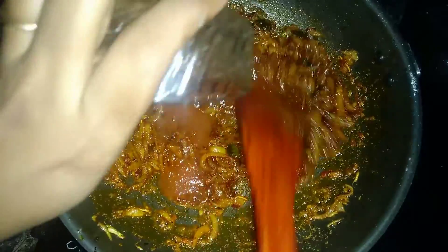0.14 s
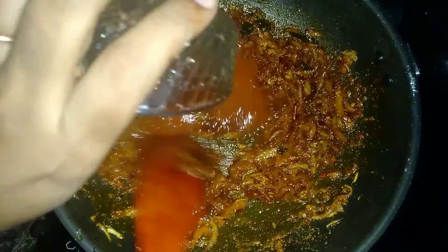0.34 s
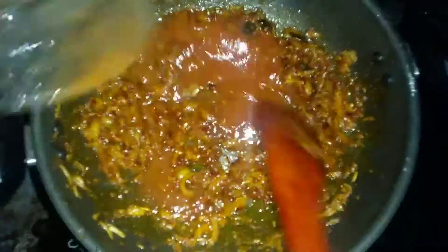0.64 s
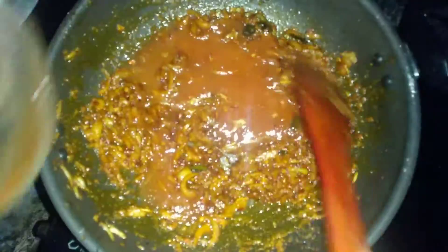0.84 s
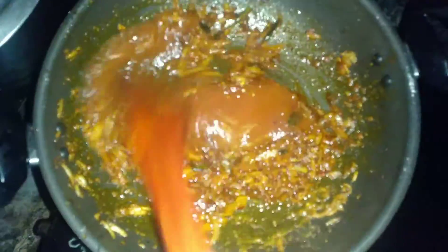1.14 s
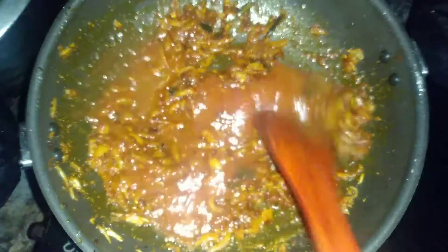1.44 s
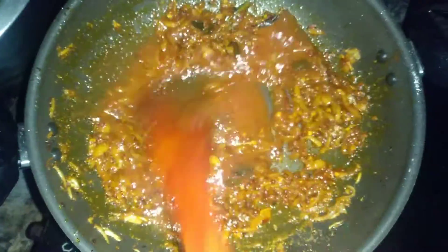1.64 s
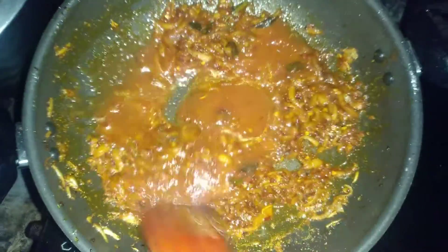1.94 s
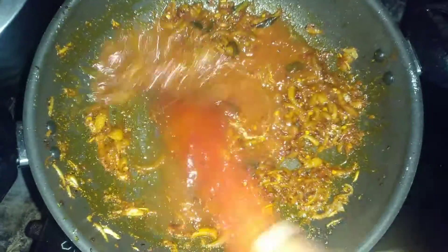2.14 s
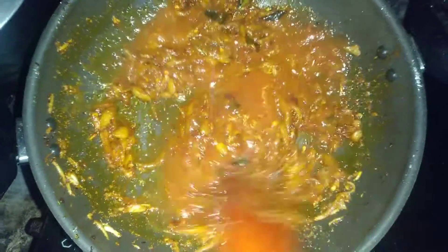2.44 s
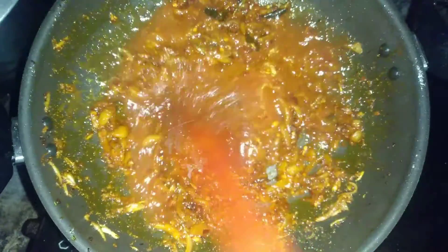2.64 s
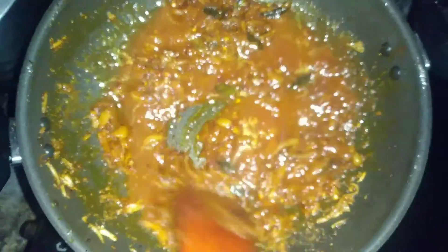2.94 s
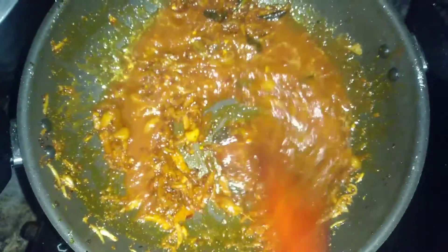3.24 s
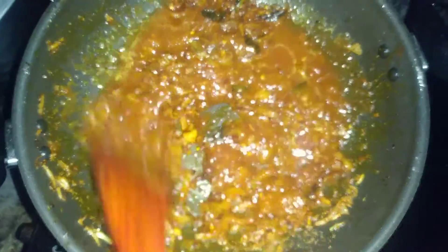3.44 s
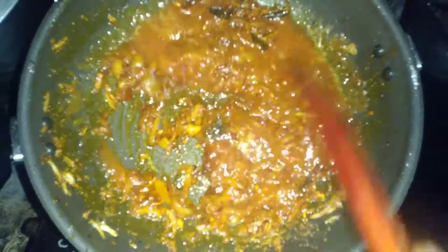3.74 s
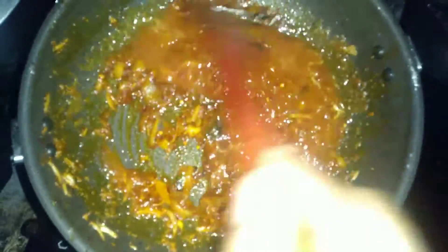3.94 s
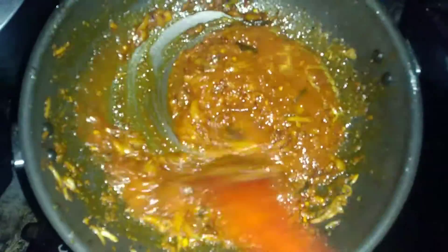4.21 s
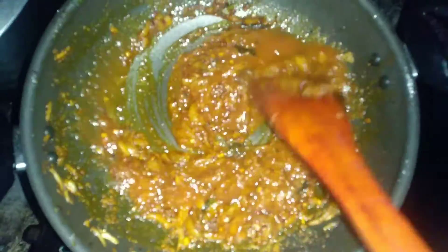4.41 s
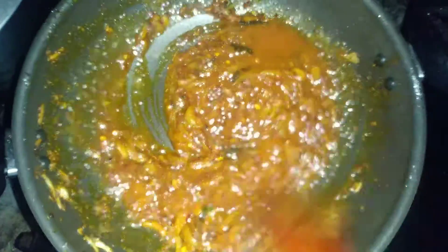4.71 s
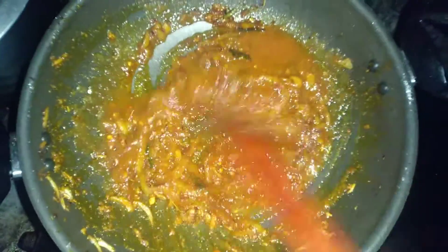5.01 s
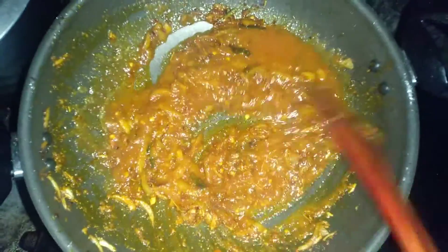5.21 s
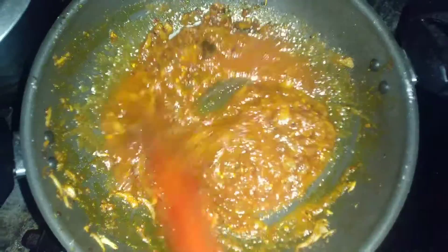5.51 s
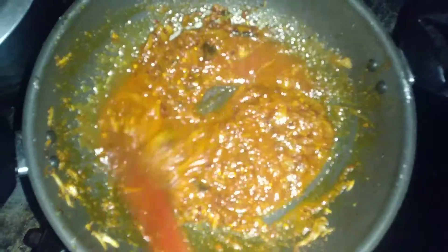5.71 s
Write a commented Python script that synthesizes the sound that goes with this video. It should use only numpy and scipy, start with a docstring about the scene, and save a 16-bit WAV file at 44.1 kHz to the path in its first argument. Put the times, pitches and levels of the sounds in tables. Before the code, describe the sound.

Close stereo sound of onion masala frying in a pan in a small kitchen. Sauce goes in with a strong hissing surge and bubbling, then the sizzle dips and swells with stirring. A spatula knocks early, scrapes and taps through the middle, and lands its hardest clack near five seconds, over faint burner rumble.

```python
"""A wide, bubbling sizzle swells and sinks; a spatula knocks and scrapes over a low rumble and a faint rising whine.
Onion masala fries in hot oil in a small kitchen while sauce is poured in and stirred.
Sizzle: random bubble bursts, shaped in spectrum, surge where wet sauce meets bare hot metal; steam jets are noise bands.
Knocks: a contact tone plus damped pan modes. Scrapes: trains of short stick-slip notes. Sauce: short bubble notes.
Burner: low shaped noise. Whine: a gliding sine. Only the spatula excites the modelled room."""
import sys
import numpy as np
from scipy import signal
from scipy.fft import rfft, irfft, next_fast_len
from scipy.io import wavfile
from scipy.ndimage import uniform_filter1d, map_coordinates

SR = 44100
rng = np.random.default_rng(int(sys.argv[2]) if len(sys.argv) > 2 else 0)


def wrap_up_sound(samples):
    """Save the sound to the file named by the first command line argument, as 16-bit audio."""
    columns = np.atleast_2d(samples).T
    # keep every value between -1 and 1, then stretch to whole-number steps
    tamed = np.clip(columns, -1, 1)
    steps = np.round(tamed * 32767).astype(np.int16)
    wavfile.write(sys.argv[1], SR, steps)


N = 258406

# Burner noise spectrum. Each row: frequency in Hz, relative density in dB per Hz.
RUMBLE_SPECTRUM = [(25, -36), (48, -17), (62, 1), (76, 6.5), (95, 4), (125, 4), (180, -10), (250, -14.5),
                   (340, 2.5), (450, -16.5), (800, -6), (1500, -21), (3000, -20.5)]
BURNER_DB = -64
# Stove shudder: level after the hardest blow, its dB per dB of blow, time to its peak.
SHUDDER_DB, SHUDDER_DB_PER_DB, SHUDDER_PEAK_S = -51, 2.1, 0.048

# Whine glide. Each row: time in seconds, pitch in Hz.
WHINE_PITCH = [(0, 335), (3.03, 339.5), (3.2, 361), (3.72, 391), (4.0, 440), (4.15, 455)]
# Whine swells. Each row: peak time in seconds, half length in seconds, level in dB.
WHINE_SWELLS = [(0.042, 0.078, -62), (3.197, 0.15, -61), (3.62, 0.11, -67), (3.971, 0.052, -50.5),
                (4.072, 0.059, -57)]

# Room decay. Each row: frequency in Hz, t60 in seconds.
ROOM_DECAY = [(150, 0.23), (1000, 0.2), (3000, 0.16), (12000, 0.061)]
ROOM_DB = -11
WALL_S, WALL_DB = 0.019, -8.5  # nearest wall's echo: delay, level beside the tail

# Level of the big sauce bubbles. Each row: time in seconds, level in dB.
SAUCE_LEVEL = [(0, -60.5), (.6, -56.5), (1.6, -54.5), (2.0, -59.5), (3.3, -61.5), (4.1, -64), (5.86, -66)]
BLUB_HZ, BLUB_OCTAVES, BLUB_CYCLES, BLUBS_PER_S = 901, 0.377, 12.6, 900  # pitch, scatter, life, rate

# Spatula strokes. Each row: start in seconds, length in seconds, level in dB, first pitch in Hz, last pitch in Hz,
# pitch scatter in octaves, share of the stroke at its hardest pressure, closing rasp re stroke in dB,
# rasp pitch in Hz, rasp scatter in octaves.
SCRAPES = [(0.403, 0.086, -45.5, 835, 953, 0.12, 0.35, -7, 1780, 0.23),
           (1.334, 0.12, -49.5, 2250, 2160, 0.023, 0.38, -17, 906, 0.11),
           (2.521, 0.057, -58, 270, 384, 0.51, 0.13, -8, 700, 0.47),
           (2.568, 0.064, -43.5, 824, 1093, 0.13, 0.47, 6, 1840, 0.095),
           (2.584, 0.05, -46.5, 2870, 2660, 0.051, 0.64, -8, 3530, 0.11),
           (3.425, 0.13, -44, 900, 1050, 0.21, 0.57, 6.5, 2390, 0.55),
           (3.433, 0.1, -45, 857, 954, .13, 0.52, -12, 1270, 0.14),
           (4.535, 0.12, -48, 2140, 2240, 0.039, 0.83, -8, 970, 0.28),
           (4.671, 0.033, -41.5, 2020, 1950, 0.089, 0.43, -12, 717, 0.18),
           (4.918, 0.061, -53, 870, 880, 0.33, 0.33, -18, 1800, 0.53),
           (5.6, 0.066, -54, 352, 240, 0.22, 0.18, -11, 800, 0.37),
           (5.672, 0.07, -49.5, 784, 634, 0.31, 0.26, -5, 405, 0.3),
           (5.728, 0.079, -44, 760, 1086, 0.26, 0.19, -6, 1870, 0.17),
           (5.734, 0.042, -53, 317, 390, 0.23, 0.27, -5, 584, 0.14)]
RASP_FROM_SHARE, RASP_CLIMB_RATIO = 0.37, 1.123  # rasp onset; it climbs from pitch / ratio to pitch * ratio
SLIPS_PER_S = 2500
JUDDERS_PER_S, JUDDER_DB = 170, 2.5

# Spatula blows. Each row: start in seconds, level in dB, contact pitch in Hz, lowest excited pitch in Hz
# (capped at 1100), highest excited pitch in Hz, thud in dB re blow, ring in dB re blow (before a common offset),
# left minus right of the clack in dB.
KNOCKS = [(0.747, -17, 947, 110, 1880, -1, -4, -8), (0.7478, -21.5, 1305, 1110, 1700, -9, -1, 4),
          (0.756, -26.5, 534, 200, 1200, -10, -13, -3), (2.586, -24.5, 924, 506, 1200, -11, -26, -6),
          (2.601, -27, 1020, 500, 1300, -16, -5, -1), (3.794, -19.5, 928, 100, 1310, 1, -1, -8),
          (4.5172, -27.5, 980, 131, 1320, 6, 3, -3), (4.676, -27, 1320, 1100, 2300, 0, 1, 1),
          (4.688, -29.5, 1550, 1090, 2400, -9, 5.5, 5), (5.1842, -14.5, 1294, 130, 2400, -3.5, -1.5, 3),
          (5.1846, -18, 890, 497, 1300, -10, -15, -4.5), (5.1852, -18.5, 1650, 1100, 2400, 0, -4, 3),
          (5.6688, -25, 900, 200, 1500, -3.5, -10.5, -6), (5.703, -35, 970, 500, 1300, -5, -14, -6),
          (5.714, -35, 410, 200, 1200, -4, -13, -1)]
# Ringing modes of the loaded pan. Each row: frequency in Hz, mean level in dB, t60 in seconds.
PAN_MODES = [(162.5, -8.5, 0.24), (246.5, -3, 0.23), (292.6, -16, 0.2), (435, -6, 0.23), (503.6, -4, 0.18),
             (618, -5, 0.14), (669, -7, 0.25), (819, -13, 0.15), (910, -1, 0.16), (983, -3.5, 0.24),
             (1195, 9.5, 0.165), (1380, -0.5, 0.12), (1512, 0.5, 0.15), (1820, -3, 0.13), (2440, -8, 0.14)]
# The pan's crowd of heavily damped modes. Each row: frequency in Hz, relative density in dB per Hz.
THUD_SPECTRUM = [(50, -42), (110, -17), (200, -9), (330, -7), (480, 5.5), (640, -1), (750, -14),
                 (920, -0.5), (1100, -6), (1280, 4), (1480, -4), (2350, -2), (2700, -14)]
# How much later the struck pan reaches the left port. Each row: frequency in Hz, lag in seconds.
PAN_LAG = [(200, 0.00027), (950, 0.00018), (1200, 0.00058), (2000, 0.0004)]
# How the struck pan radiates. Each row: frequency in Hz, left minus right in dB.
PAN_LEAN = [(200, -1.5), (350, 0), (520, -1), (750, -13), (1000, 7), (1300, 4.5), (2000, 0)]
CLACK_RISE_S, CLACK_S = 0.00088, 0.0047
SPATULA_TOP_HZ = 2500

# Steam pockets escaping the paste. Each row: start in seconds, length in seconds, level in dB, centre in Hz,
# half width in Hz.
JETS = [(0.291, 0.11, -36.5, 4360, 1150), (1.132, 0.04, -31, 8050, 500), (2.4, 0.053, -34, 7300, 450),
        (3.122, 0.031, -33.5, 8000, 700), (3.228, 0.049, -30.5, 8040, 800),
        (4.345, 0.047, -37.5, 8060, 800), (4.759, 0.33, -48, 4800, 1380)]

# Small bubbles in the paste. Each row: frequency in Hz, relative density in dB per Hz.
FRYING_SPECTRUM = [(250, -24), (500, -37), (880, -10), (1300, -9.5), (2200, -0.5), (2700, -5), (3500, 0),
                   (5000, 1), (6200, 3.5), (7500, 7.5), (10000, -21.5)]
# Main hiss. Each row: frequency in Hz, relative density in dB per Hz.
HISS_SPECTRUM = [(4000, -36), (6000, -20), (7000, -5), (7700, 1.5), (8700, 1.5), (9600, -10.5),
                 (11000, -19), (13000, -56)]
# Finest spray. Each row: frequency in Hz, relative density in dB per Hz.
SPRAY_SPECTRUM = [(7000, -29), (9500, 7.5), (11500, 3.5), (12600, 0.5), (13600, 0), (15800, -4.5)]
# Stereo balance of the frying. Each row: frequency in Hz, left minus right in dB.
FRYING_LEAN = [(400, 6), (800, 7), (1400, -0.5), (2300, 3), (3200, -2), (4200, -5), (4900, -10),
               (6000, -10.5)]
# Frying between surges; boiling() offsets the balance. Each row: time in seconds, hiss in dB,
# spray re hiss in dB, left minus right in dB.
SIMMER = [(0, -38.5, -10, -12), (.18, -39.5, -12, -10), (1.32, -57.5, -1.5, -3), (2.3, -39.5, -8.5, -11),
          (3.1, -43, -3.5, -7.5), (3.6, -47.5, -5, -19), (4.0, -50.5, -1.5, -15), (4.5, -46, -5.5, -11),
          (5.4, -43, -1, -9), (5.86, -44.5, -7, -9)]
# Wet sauce meets bare hot metal; boiling() offsets the balance. Each row: start in seconds, hold in seconds,
# fade time constant in seconds, hiss in dB, spray re hiss in dB, left minus right in dB.
SURGES = [(0.224, 0.21, 0.081, -31.5, -7.5, -12.5), (0.483, 0.46, 0.3, -35, -4, -29),
          (1.035, 0.14, 0.06, -37.5, -29, -8), (1.331, 0.28, 0.26, -33.5, -8.5, -16),
          (1.42, 0.16, 0.044, -38, -5, -18), (1.88, 0.016, 0.12, -38, -5, -4),
          (1.987, 0.14, 0.034, -40.5, -9, -8), (2.395, 0.15, 0.096, -35, -1, -3.5),
          (2.718, 0.029, 0.015, -42.5, -1, -12), (3.229, 0.074, 0.31, -40, -2, -8),
          (3.466, 0.024, 0.0076, -36.5, -24, -12), (4.146, 0.12, 0.029, -49, -3, -4),
          (4.546, 0.027, 0.03, -43.5, -8, -7), (4.722, 0.18, 0.19, -36.5, -2.5, -4.5),
          (5.545, .005, 0.014, -50, 8, -6)]
SURGE_RISE_S = 0.07
USUAL_HISS_DB = -40
FRYING_DB, FRYING_DB_PER_HISS_DB = -41, 0.77  # level at the usual hiss; how it follows the hiss
PIP_HZ, PIP_OCTAVES, PIP_CYCLES, PIPS_PER_S = 8060, 0.13, 9.2, 400  # ringing oil bubbles: pitch, scatter, life, rate
PIP_DB, SPIT_DB = -5, 7  # pips beside the hiss bursts, spits re hiss
SPUTTER_DB = 0.7
RIPPLE_PER_S = 14  # how fast the bubbling wanders over the pan

TOP_HZ = 15850


def amp(db):
    """Decibels to gain."""
    return 10 ** (np.asarray(db) / 20)


def unit(x):
    """x at rms 1."""
    return x / np.sqrt(np.mean(x ** 2) + 1e-20)


def along(points, hz):
    """Interpolate (Hz, value) points on a log frequency axis."""
    f, v = np.transpose(points)
    return np.interp(np.log(hz + 1), np.log(f + 1), v)


def curves(rows):
    """One value per sample for each column after the time."""
    s, *cols = np.transpose(rows)
    return [np.interp(np.arange(N) / SR, s, c) for c in cols]


def wobble(knots_per_s):
    """A smooth random curve."""
    knots = rng.standard_normal(int(N * knots_per_s / SR) + 4)
    return map_coordinates(knots, [np.arange(N) * knots_per_s / SR])


def filtered(x, response):
    """x times a response of frequency."""
    size = x.shape[-1]
    m = next_fast_len(size + 8192)
    return irfft(rfft(x, m) * response(np.fft.rfftfreq(m, 1 / SR)), m)[..., :size]


def panned(lean_db):
    """Left and right gains of mean power 1."""
    gains = amp(np.array([[.5], [-.5]]) * lean_db)
    return gains / np.sqrt(np.mean(gains ** 2, axis=0))


def left_lag(hz, lag_s):
    """Phase response that brings a sound to the left port lag_s after the right."""
    return np.exp(np.array([[-1j], [1j]]) * np.pi * hz * lag_s)


def at_ports(x, lean_db, lag_s):
    """A sound from one spot of the pan differs in level and arrival at the two ports."""
    return filtered(x, lambda hz: left_lag(hz, lag_s)) * panned(lean_db)


def add(track, s, sound):
    """Mix a sound into a track at time s."""
    start = max(round(s * SR), 0)
    part = track[..., start:start + sound.shape[-1]]
    part += sound[..., :part.shape[-1]]


def kitchen(x, delay_s):
    """A diffuse tail, treble dying first, fades in after delay_s; one wall adds a discrete echo."""
    hz, t, z = signal.stft(rng.standard_normal((2, SR // 2)), SR, nperseg=256)
    decay = amp(-60 * t / along(ROOM_DECAY, hz)[:, None])
    tail = signal.istft(z * decay, SR, nperseg=256)[1]
    shared = filtered(tail[0], lambda hz: 1 / (1 + (hz / 700) ** 4))  # long waves reach both ports alike
    tail = shared + filtered(tail, lambda hz: 1 - 1 / (1 + (hz / 700) ** 4))
    tail = tail * np.clip(np.arange(tail.shape[1]) / SR / delay_s - 1, 0, 1)
    diffuse = signal.fftconvolve(x, tail / np.linalg.norm(tail[0]), axes=1)[:, :N]
    echo = np.pad(x, ((0, 0), (int(WALL_S * SR), 0)))[:, :N]
    return diffuse + amp(WALL_DB) * echo


def stove():
    """Burner turbulence is low-pitched noise; blows on the pan set the stove shuddering, the hardest ones most."""
    t, level = np.arange(N) / SR, amp(BURNER_DB)
    hardest_db = max(db for _, db, *_ in KNOCKS)
    for s, db, *_ in KNOCKS:
        age = np.maximum(t - s, 0) / SHUDDER_PEAK_S
        shudder = amp(SHUDDER_DB + SHUDDER_DB_PER_DB * (db - hardest_db)) * age * np.exp(1 - age)
        level = np.hypot(level, shudder)
    air = rng.standard_normal(N) + 0.39 * rng.standard_normal((2, N))  # mostly common to both ports
    rumble = unit(filtered(air, lambda hz: amp(along(RUMBLE_SPECTRUM, hz))))
    return rumble * level * amp(1.9 * wobble(5.14))


def whine():
    """A thin sine climbs in pitch with a slight waver, coming and going in swells."""
    t = np.arange(N) / SR
    pitch_hz, = curves(WHINE_PITCH)
    pitch_hz = pitch_hz * (1 + 0.0018 * wobble(29.8))
    level = sum(amp(db) * np.exp(-2 * ((t - s) / half_s) ** 2) for s, half_s, db in WHINE_SWELLS)
    return level * np.sqrt(2) * np.sin(2 * np.pi * np.cumsum(pitch_hz) / SR)


def bubble_notes(rate_per_s, pitch_hz, octaves, life_cycles, spread_db):
    """Single bubbles at random moments, each with a short note that rises slightly; rms 1."""
    count, t = int(rate_per_s * N / SR), np.arange(SR // 50) / SR
    start = rng.integers(N, size=(count, 1))
    scatter = rng.standard_normal((count, 1))
    size = rng.standard_normal((count, 1))
    cycles = t * pitch_hz * 2 ** (octaves * scatter)
    age = cycles / life_cycles
    envelope = np.exp(-age) * (1 - np.exp(-6.7 * age))
    notes = amp(spread_db * size) * np.sin(2 * np.pi * cycles * (1 + age / 45)) * envelope
    return unit(np.bincount((start + np.arange(len(t))).ravel(), notes.ravel(), N)[:N])


def sauce():
    """Big bubbles burst in the wet sauce, each with a short low note."""
    db, = curves(SAUCE_LEVEL)
    blubs = bubble_notes(BLUBS_PER_S, BLUB_HZ, BLUB_OCTAVES, BLUB_CYCLES, spread_db=5)
    return at_ports(blubs * amp(db), lean_db=-4.5, lag_s=0.0002)


def stick_slip(length_s, first_hz, last_hz, scatter_octaves, crest):
    """The blade sticks and slips; each slip rings briefly at a pitch that slides along the stroke; rms 1."""
    n, t = int(length_s * SR), np.arange(SR // 50) / SR
    where = rng.random((int(length_s * SLIPS_PER_S) + 1, 1))  # share of the stroke
    glide = first_hz * (last_hz / first_hz) ** where
    pitch = glide * 2 ** (scatter_octaves * rng.standard_normal(where.shape))
    cycles = t * pitch
    life_cycles = 4.4 + 0.35 / (scatter_octaves + .01)  # evenly pitched slips ring on as a squeak
    envelope = np.exp(-cycles / life_cycles) * (1 - np.exp(-cycles / 0.47))
    sign = np.sign(rng.standard_normal(where.shape))
    slips = sign * np.sqrt(pitch) * np.sin(2 * np.pi * cycles) * envelope
    pressure = np.interp(where, [0, crest, 1], [.1, 1, .35])
    grip = rng.standard_normal(size=40)  # the blade judders, gripping unevenly
    judder = np.interp(where * length_s * JUDDERS_PER_S, np.arange(len(grip)), grip)
    slips = slips * pressure * amp(JUDDER_DB * judder)
    return unit(np.bincount(((where * n).astype(int) + np.arange(len(t))).ravel(), slips.ravel()))


def scrapes():
    """Each stroke rubs through the paste; towards its end the edge bites the metal with a climbing rasp."""
    out = np.zeros(N)
    for s, length_s, db, first_hz, last_hz, scatter, crest, rasp_db, rasp_hz, rasp_scatter in SCRAPES:
        add(out, s, amp(db) * stick_slip(length_s, first_hz, last_hz, scatter, crest))
        low_hz, high_hz = rasp_hz / RASP_CLIMB_RATIO, rasp_hz * RASP_CLIMB_RATIO
        rasp = stick_slip((1 - RASP_FROM_SHARE) * length_s, low_hz, high_hz, rasp_scatter, crest)
        add(out, s + RASP_FROM_SHARE * length_s, amp(db + rasp_db) * rasp)
    return at_ports(out, lean_db=0.0, lag_s=0.00011)


def pan_ring(t):
    """The pan's modes ring down, each at a slightly random level."""
    ring = np.zeros(len(t))
    for hz, db, t60_s in PAN_MODES:
        decay = amp(db + rng.normal(0, 1) - 60 * t / t60_s)
        ring += decay * np.sin(2 * np.pi * (hz * t + rng.random()))
    return ring


def pan_thud(t):
    """Crowded, damped modes as shaped noise: a quick shock, then a short shudder."""
    noise = unit(filtered(rng.standard_normal(len(t)), lambda hz: amp(along(THUD_SPECTRUM, hz))))
    return noise * (amp(-2.0 - 60 * t / 0.025) + amp(-18.0 - 60 * t / 0.23))


def knocks():
    """Each blow gives an abrupt, hollow clack; the pan shudders and rings briefly, damped by the food."""
    out, t = np.zeros((2, N)), np.arange(SR // 2) / SR
    radiation = lambda hz: panned(along(PAN_LEAN, hz)) * left_lag(hz, along(PAN_LAG, hz))
    for s, db, pitch_hz, low_hz, high_hz, thud_db, ring_db, lean_db in KNOCKS:
        age = np.maximum(t - np.array([[along(PAN_LAG, pitch_hz)], [0]]), 0)
        contact = (1 - np.exp(-age / CLACK_RISE_S)) * np.exp(-(age / CLACK_S) ** 6)
        clack = contact * np.sin(2 * np.pi * pitch_hz * age) * panned(lean_db)
        body = amp(thud_db) * pan_thud(t) + amp(ring_db - 17.5) * pan_ring(t)
        body = filtered(body, radiation) * (1 - np.exp(-t / 0.00093))
        # a soft contact spares the high modes, a glancing one the low
        reach = signal.butter(4, [min(low_hz, 1100), high_hz], "band", fs=SR, output="sos")
        add(out, s, amp(db) * (clack + signal.sosfilt(reach, body)))
    return signal.sosfilt(signal.butter(6, SPATULA_TOP_HZ, fs=SR, output="sos"), out)


def jets():
    """Steam escapes through a narrow gap with a brief, hissing squeal."""
    out = np.zeros((2, N))
    for s, length_s, db, centre_hz, half_width_hz in JETS:
        n = int(length_s * SR)
        band = lambda hz: 1 / (1 + ((hz - centre_hz) / half_width_hz) ** 4)
        squeal = unit(filtered(rng.standard_normal((2, n)), band))
        add(out, s, amp(db) * squeal * np.sqrt(np.hanning(n)))
    return out * panned(lean_db=-21)


def patchy(x, depth_db, order, size):
    """Random gain patches of size (bins, frames) on frames of order samples."""
    z = signal.stft(x, nperseg=order)[2]
    field = uniform_filter1d(rng.standard_normal(z.shape[1:]), size[0], 0)
    field = unit(uniform_filter1d(field, size[1], 1))
    return signal.istft(z * amp(depth_db * field), nperseg=order)[1][:, :N]


def pan_walls(x, echo_db):
    """Early echoes off the pan's sides ripple the spectrum; they shift as the bubbling wanders."""
    out, place = x.copy(), np.arange(N) * RIPPLE_PER_S / SR
    for port in range(2):
        for delay in rng.integers(SR // 2000, SR // 250, size=8):  # samples
            knots = rng.standard_normal(size=400)
            strength = np.interp(place, np.arange(len(knots)), knots)
            out[port] += amp(echo_db) * strength * np.roll(x[port], delay)
    return out


def burst_sizes(rate_per_s, spread_db, limit):
    """Sparse impulses at random moments, of exponentially scattered dB size."""
    hits = rng.random(N) < rate_per_s / SR
    return hits * amp(spread_db * np.minimum(rng.exponential(size=N), limit))


def bubbles(spectrum, rate_per_s, spread_db, wash_db, swarm_db):
    """Tiny bursts of unequal size on a wash of countless smaller ones; stereo, rms 1."""
    bursts = unit(burst_sizes(rate_per_s, spread_db, limit=4) * rng.standard_normal((2, N)))
    crowd = bursts + amp(wash_db) * rng.standard_normal((2, N))
    crowd = patchy(crowd, swarm_db, order=128, size=(7, 5))  # bubbles of one size burst together
    crowd = patchy(crowd, 2.6, order=1024, size=(4, 3))  # narrow bands flicker
    return unit(filtered(pan_walls(crowd, echo_db=-8.0), lambda hz: amp(along(spectrum, hz))))


def spits(rate_per_s, spread_db):
    """Now and then a single drop of water bursts in the oil with a sharp tick."""
    sizes = burst_sizes(rate_per_s, spread_db, limit=2.5)
    t = np.arange(SR // 500) / SR
    crack = rng.standard_normal((2, len(t))) * amp(-60 * t / 0.00058)
    crack = signal.sosfilt(signal.butter(2, 3500, "high", fs=SR, output="sos"), crack)
    return signal.fftconvolve(sizes[None], crack / np.abs(crack).max(), axes=1)[:, :N]


def boiling():
    """Surges rise, hold and fade over the simmer, adding in power; returns stereo hiss and spray levels."""
    t = np.arange(N) / SR
    simmer_db, simmer_spray_db, simmer_lean_db = curves(SIMMER)
    spots = [(amp(simmer_db), simmer_spray_db, simmer_lean_db)]
    for s, hold_s, fade_s, db, spray_db, lean_db in SURGES:
        rise = np.clip((t - s) / SURGE_RISE_S, 0, 1)
        fall = np.exp(-np.maximum(t - s - SURGE_RISE_S - hold_s, 0) / fade_s)
        spots.append((amp(db) * rise * fall, spray_db, lean_db))
    hiss_power, spray_power = 0, 0
    for level, spray_db, lean_db in spots:
        hiss_power = hiss_power + (level * panned(lean_db - 0.5)) ** 2
        spray_power = spray_power + (level * amp(spray_db) * panned(0.3 * lean_db + 3.5)) ** 2
    return np.sqrt(hiss_power), np.sqrt(spray_power)


def sizzle():
    """Water flashes to steam in the oil: coarse frying, a strong hiss, fine spray and spits."""
    hiss_level, spray_level = boiling()
    vigour = np.sqrt(np.mean(hiss_level ** 2, axis=0)) / amp(USUAL_HISS_DB)
    sputter = amp(SPUTTER_DB * wobble(35))

    frying = bubbles(FRYING_SPECTRUM, rate_per_s=2500, spread_db=3.5, wash_db=9.5, swarm_db=1.0)
    frying = unit(filtered(frying, lambda hz: panned(along(FRYING_LEAN, hz))))
    frying = frying * amp(FRYING_DB) * vigour ** FRYING_DB_PER_HISS_DB

    pips = np.array([bubble_notes(PIPS_PER_S, PIP_HZ, PIP_OCTAVES, PIP_CYCLES, spread_db=3.5)
                     for port in range(2)])
    hiss = bubbles(HISS_SPECTRUM, rate_per_s=2800, spread_db=2.0, wash_db=-1.0, swarm_db=0.5)
    hiss = unit(amp(PIP_DB) * pips + hiss) * amp(0.96 + SPUTTER_DB * wobble(25.03))

    spray = bubbles(SPRAY_SPECTRUM, rate_per_s=1500, spread_db=-23.0, wash_db=11, swarm_db=1.5)
    spray = spray * amp(3.0 + 0.86 * wobble(21.8))

    ticks = spits(rate_per_s=15, spread_db=-0.5) * amp(SPIT_DB)
    return sputter * (frying + hiss * hiss_level + spray * spray_level) + ticks * hiss_level


def scene():
    """The stove and whine, the spatula in the room, and the sizzling pan."""
    background = stove() + whine()
    spatula = scrapes() + knocks()
    room = amp(ROOM_DB) * kitchen(spatula, delay_s=0.0078)
    return background + room + sauce() + spatula + jets() + sizzle()


def record(dry):
    """Band limit: nothing passes above TOP_HZ."""
    return filtered(dry, lambda hz: hz < TOP_HZ)


dry = scene()
out = record(dry)
wrap_up_sound(out)
```